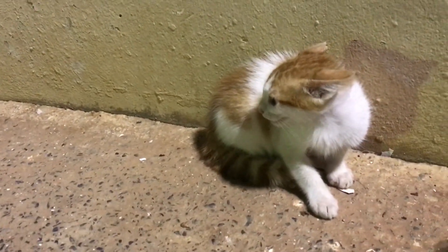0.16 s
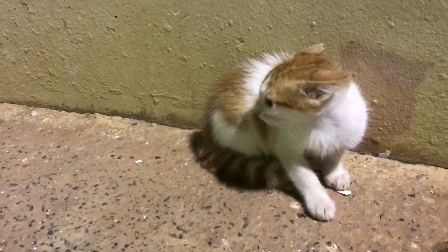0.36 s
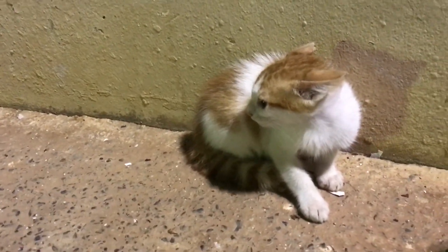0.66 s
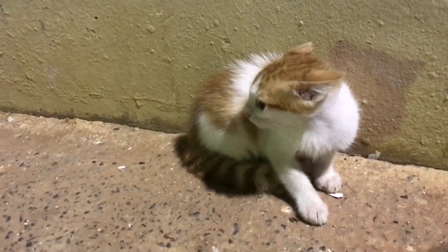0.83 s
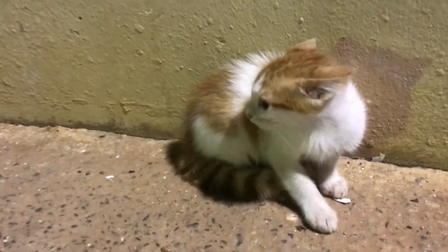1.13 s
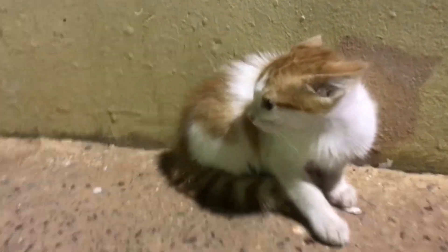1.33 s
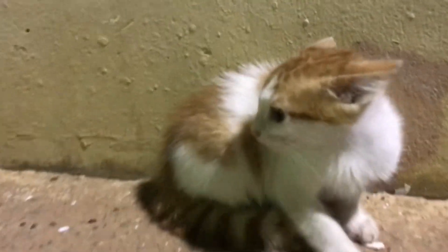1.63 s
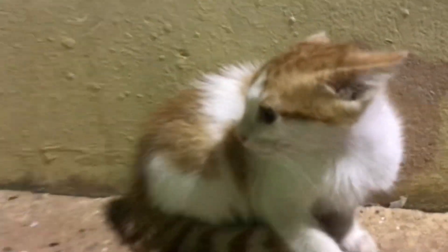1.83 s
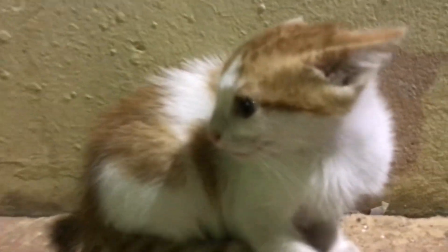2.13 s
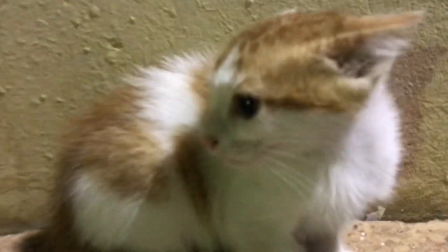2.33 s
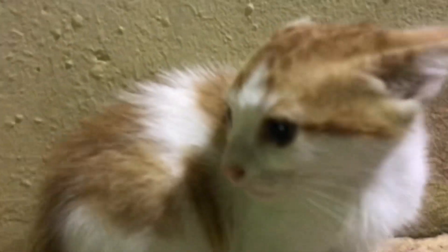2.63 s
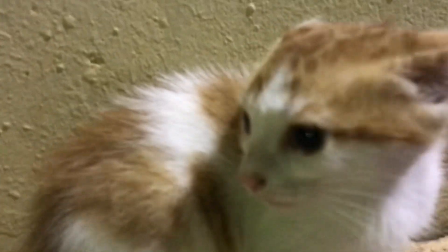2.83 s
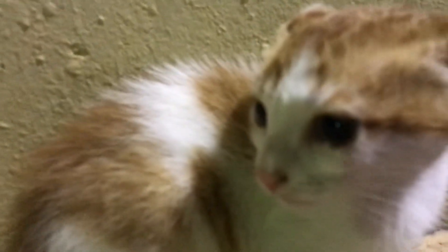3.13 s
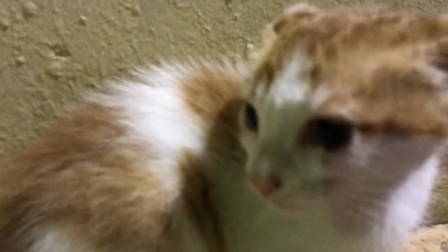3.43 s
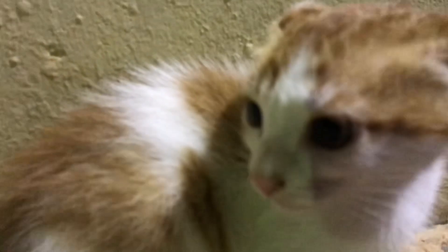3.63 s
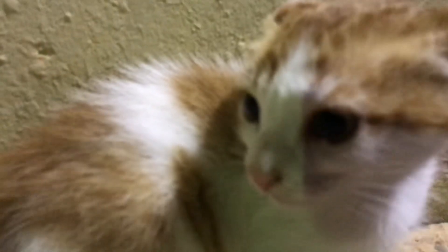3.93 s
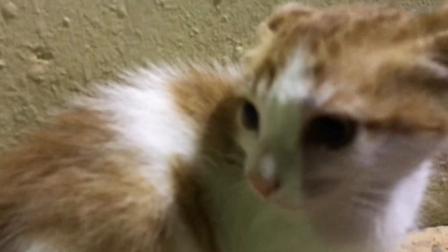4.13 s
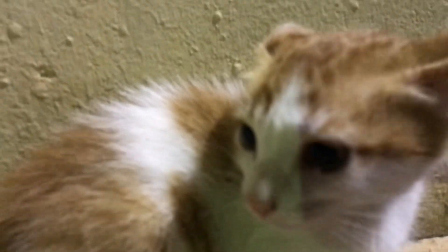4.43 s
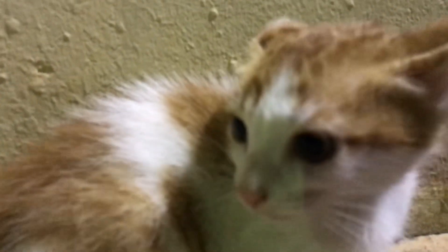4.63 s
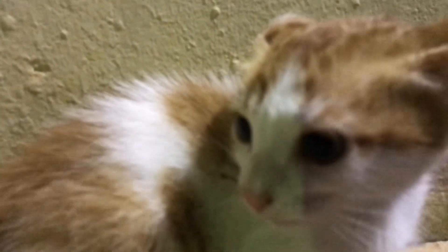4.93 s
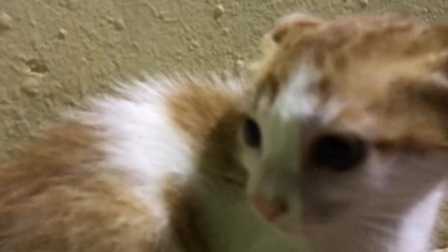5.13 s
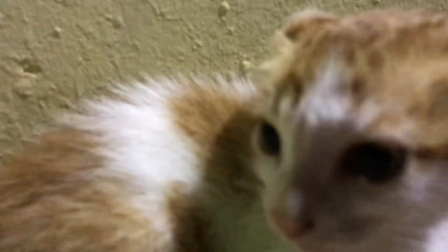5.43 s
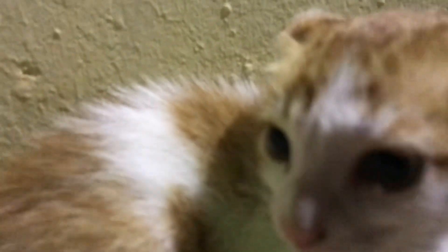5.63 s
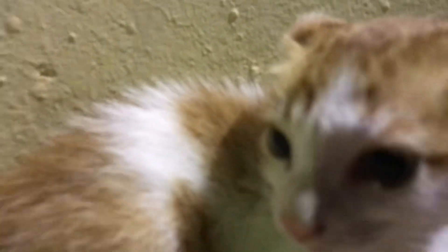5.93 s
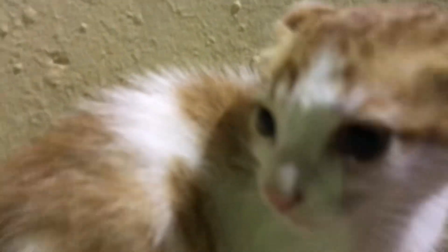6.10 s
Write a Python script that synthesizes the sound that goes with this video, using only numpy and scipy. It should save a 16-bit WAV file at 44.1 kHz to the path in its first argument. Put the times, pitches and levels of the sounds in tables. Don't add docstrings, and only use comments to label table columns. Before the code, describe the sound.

Three drawn-out throaty growls from a small kitten, humming and rattling, with low wind buffeting and a faint motor drone outdoors.

```python
import sys
import numpy as np
from scipy import signal
from scipy.fft import rfft, irfft
from scipy.io import wavfile
from scipy.ndimage import uniform_filter1d

SR = 44100
rng = np.random.default_rng(int(sys.argv[2]) if len(sys.argv) > 2 else 0)


def generate_wav(sig):
    pcm = np.round(np.clip(np.atleast_2d(sig).T, -1, 1) * 32767).astype(np.int16)
    wavfile.write(sys.argv[1], SR, pcm)


def nominal_scale(level):
    x = np.asarray(level, float) / 20
    return 10 ** x


N = 276066


def rms_one(x):
    return x / np.sqrt(np.mean(x ** 2) + 1e-20)


def in_time(rows):
    s, *columns = np.transpose(rows)
    return [np.interp(np.arange(N) / SR, s, c) for c in columns]


def joined(calls, edge_s=0.0027):
    t = np.arange(N) / SR
    gate = np.zeros(N)
    for call in calls:
        start, end = call[0][0], call[-1][0]
        since_start = t - start + (start == 0)
        until_end = end + .001 - t + (end > 6.2)
        gate += np.clip(np.minimum(since_start, until_end) / edge_s, 0, 1)
    return in_time([row for call in calls for row in call]), gate


def bumps(rows):
    t = np.arange(N) / SR
    return sum(size_db * np.exp(-((t - s) / half) ** 4) for s, half, size_db in rows)


def drift(rate_hz):
    r = np.exp(-2 * np.pi * rate_hz / SR)
    wander = signal.lfilter([1], [1, -2 * r, r * r], rng.standard_normal(N + SR))
    return rms_one(wander[SR:])


def band(x, low_hz, high_hz, order=2):
    return signal.sosfilt(signal.butter(order, [low_hz, high_hz], "band", fs=SR, output="sos"), x)


def evened(x, seconds):
    power = uniform_filter1d(x ** 2, size=int(seconds * SR)) + 1e-12
    return rms_one(x / power ** 0.34)


def resonate(x, hz, width):
    r = np.exp(-np.pi * width / SR)
    poles = [1, -2 * r * np.cos(2 * np.pi * hz / SR), r * r]
    return signal.lfilter([(1 - r * r) / 2, 0, (r * r - 1) / 2], poles, x)


def cavity(x, modes):
    out = np.zeros(N)
    for k, (hz, width, db) in enumerate(modes):
        ring = resonate(resonate(x, hz, width), hz, width * 1.37)
        out += nominal_scale(db) * (-1) ** k * ring
    return out / np.sqrt(uniform_filter1d(out ** 2, size=6000) + 1e-12)


def tone(hz, level_db):
    return np.sqrt(2) * nominal_scale(level_db) * np.sin(2 * np.pi * np.cumsum(hz) / SR)


def clicks_at(turns, spread_db):
    return np.diff(np.floor(turns), prepend=0) * nominal_scale(spread_db * rng.standard_normal(N))


def air():
    # f/Hz, level per Hz/dB
    hiss_colour = [(150, -39), (260, -1), (348, -2.5), (427, -8), (490, -5.5), (971, -11), (1400, -17),
                   (15500, -29)]
    # t/s, level/dB
    street = [(.5, -75), (1.1, -73), (1.9, -76), (2.2, -76.5), (4.0, -65.5), (4.3, -65.5), (4.6, -65.5),
              (5.0, -67)]
    hz, level_db = np.transpose(hiss_colour)
    f = np.arange(N // 2 + 1) * SR / N + 1
    colour = nominal_scale(np.interp(np.log(f), np.log(hz), level_db))
    hiss = irfft(rfft(rng.standard_normal(N)) * colour, N)
    hiss = nominal_scale(-76.0) * hiss / np.sqrt(np.mean(band(hiss, 1204, 4300) ** 2))
    tyres = rng.standard_normal(N)
    murmur = rms_one(band(tyres, 184, 249)) + nominal_scale(-7.5) * rms_one(band(tyres, 450, 1440))
    street_db, = in_time(street)
    return hiss + nominal_scale(street_db + 2.1 * drift(6.7)) * murmur


def wind():
    # t/s, level/dB
    strength = [(0, -54), (.5, -59.5), (.8, -58), (1.1, -62), (1.25, -51.5), (1.75, -56), (1.9, -59.5),
                (2.25, -50), (2.55, -52.5), (2.9, -57), (3.4, -51), (3.7, -54), (4.1, -51.5), (4.5, -53),
                (4.85, -46), (5.1, -52.5), (5.6, -54), (6.26, -59)]

    def gusting(level_db):
        return nominal_scale(level_db + 2 * drift(3.3))

    white = rng.standard_normal((3, N))
    thump = gusting(-6.5) * evened(band(white[0], 37.8, 63.0, order=3), 0.068)
    buffet = gusting(-2.5) * evened(band(white[1], 57.7, 94), 0.092)
    flutter = gusting(-11.5) * evened(band(white[2], 110.7, 162.0, order=3), 0.018)
    wind_db, = in_time(strength)
    return nominal_scale(wind_db) * (thump + buffet + flutter)


def motors():
    # t/s, f/Hz, level/dB
    idle = [(4.75, 51.04, -70), (5.0, 50.55, -57), (5.44, 50.64, -51.5), (5.82, 51.7, -52),
            (6.26, 51.6, -54)]
    # t/s, f/Hz, level/dB
    passing = [(3.35, 127, -57), (3.6, 126.8, -62), (3.95, 130.5, -65), (4.2, 135, -56.5),
               (4.35, 140.8, -59.5), (4.65, 143, -57), (4.85, 146, -62)]
    # t/s, f/Hz, level/dB
    whine = [(3.2, 1662, -110), (3.35, 1662, -85), (3.65, 1661, -87), (3.9, 1662, -110)]
    out = tone(*in_time(whine))
    for rows in (idle, passing):
        (hz, level_db), gate = joined([rows], edge_s=0.17)
        out = out + gate * tone(hz * (1 + .01 * drift(6)), level_db + 1 + 2.2 * drift(8))
    return out


def swish():
    # t/s, level/dB
    swell = [(0, -74), (.08, -71), (.27, -70), (.33, -88), (6.26, -100)]
    white = rng.standard_normal(N)
    ring = rms_one(resonate(resonate(white, 1050, 160), 1050, 200))
    sheen = rms_one(resonate(white, 5600, 700))
    swell_db, = in_time(swell)
    return nominal_scale(swell_db) * (ring + nominal_scale(-14) * sheen)


def fold_hum(pitch, hum_db, cycles, slack, loose):
    swayed = pitch * (1 + 0.12 * loose / cycles * np.cos(slack - 1.5))
    stumble = np.clip(loose - np.roll(loose, int(.012 * SR)), 0, 1)
    hum = tone(swayed, hum_db - 10 * stumble + 1.6 * loose * drift(35))
    octave_db = -65 + 0.21 * (hum_db + 43.5) + 3 * drift(10)
    return hum + tone(2 * swayed, octave_db)


def throat_rattle(pitch, rattle_db, uneven, slack):
    # f/Hz, width/Hz, level/dB
    chest = [(136, 26, 0)]
    low_throat = [(272.8, 74.6, 0)]
    high_throat = [(308, 119.6, -3), (391.7, 124, -3.5)]
    nose = [(544, 150, 6), (679, 215, -1.5)]
    mouth = [(886, 143, 6.5), (1020, 130, -5)]
    # t/s, half length/s, change of leak/dB
    lips = [(.15, 0.12, -9), (2.75, 0.21, 7), (3.65, 0.14, -0.5), (5.65, .3, 2.5)]
    turns = np.cumsum(pitch) / SR
    shifted = np.maximum.accumulate(turns + .27 * np.sin(slack) + .9 * uneven * drift(120))
    pulses = -clicks_at(shifted, spread_db=1.5) * nominal_scale(3 * np.cos(slack - .8))
    breathy = pulses + 0.024 * rng.standard_normal(N)
    rings = [(pulses, chest, -10), (pulses, low_throat, 2.5), (pulses, high_throat, -1.5),
             (breathy, nose, -8), (breathy, mouth, -17 + bumps(lips))]
    rattle = np.zeros(N)
    for drive, modes, db in rings:
        waver_db = 1.2 * drift(7.8)
        rattle += nominal_scale(rattle_db + db + waver_db) * cavity(drive, modes)
    return rattle


def snap():
    # t/s, level/dB
    catch = (2.341, -39.5)
    start, level_db = catch
    after = np.maximum(np.arange(N) / SR - start, 0) / .0006
    return nominal_scale(level_db) * after * np.exp(1 - after)


def kitten():
    # t/s, pitch/Hz, hum level/dB, rattle level/dB
    growls = [
        [(0.0, 187, -50.5, -58), (.2, 194.7, -47, -59), (.27, 206.9, -47, -59.5), (.47, 218.1, -49.5, -56.5),
         (.5, 235, -46.5, -62.5), (.72, 257.6, -46.5, -54), (.87, 255.4, -49, -56),
         (1.015, 238.4, -56.5, -59.5), (1.04, 238, -69, -75)],
        [(2.335, 186.8, -50, -64), (2.47, 191.6, -47, -56), (3.04, 194.6, -43, -51), (3.17, 208.2, -42, -50),
         (3.2, 232.1, -41, -50.5), (3.48, 240.8, -40.5, -52.5), (3.51, 223.2, -44.5, -46.5),
         (3.895, 214.5, -50.5, -50), (3.935, 200.5, -59, -70.5)],
        [(5.075, 200.2, -53, -64.5), (5.12, 190.5, -46.5, -55.5), (5.3, 181.9, -47.5, -52.5),
         (5.6, 184.1, -45, -51.5), (5.68, 204.4, -44, -50.5), (5.92, 208.2, -46.5, -52),
         (6.13, 205.1, -49.5, -50.5), (6.18, 225.4, -45, -51.5), (6.26, 204.8, -56, -54)],
    ]
    # t/s, fold cycles per slack cycle, irregularity [0-1]
    regime = [(0, 3, .05), (.55, 3, .06), (.62, 2, .11), (1.1, 2, .11), (2.3, 3, .12), (2.8, 3, .08),
              (2.84, 3, .02), (3.05, 3, .03), (3.25, 3, .11), (3.5, 3, .12), (3.95, 3, .12), (5.05, 3, .12),
              (5.3, 2.4, .09), (5.55, 2.4, .09), (5.62, 3, .13), (6.26, 3, .12)]
    # t/s, half length/s, depth/dB
    lapses = [(.55, .007, -12), (.623, .021, -18), (.682, .022, -13), (.74, .021, -16), (.812, .012, -10),
              (.858, .02, -16), (.965, .021, -16), (2.385, .012, -7), (2.44, .01, -7), (2.545, .012, -8),
              (2.71, .014, -7), (2.77, .01, -6), (3.212, .026, -11), (3.283, .012, -8), (3.325, .008, -7),
              (3.4, .014, -10), (3.467, .023, -13), (5.153, .009, -7), (5.197, .01, -10), (5.24, .011, -7),
              (5.44, .009, -8), (5.59, .011, -9), (6.18, .014, -10)]
    (pitch, hum_db, rattle_db), gate = joined(growls)
    cycles, uneven = in_time(regime)
    loose = nominal_scale(bumps(lapses))
    shake = .028 * drift(40) + .22 * uneven * drift(14)
    pitch = pitch * (1 + .04 * (1 - loose) + loose * shake)
    slack_hz = pitch / cycles * np.exp(2.2 * uneven * drift(45))
    slack = 2 * np.pi * np.cumsum(slack_hz) / SR

    hum = fold_hum(pitch, hum_db, cycles, slack, loose)
    rattle = throat_rattle(pitch, rattle_db, uneven, slack)
    voice = hum + loose * nominal_scale(1.5 * drift(14)) * rattle

    def power(size):
        return uniform_filter1d(uniform_filter1d(voice ** 2, size=size), size=size) + 1e-12

    held = (power(1500) / power(200)) ** .3
    return gate * voice * held + snap()


def scene():
    return (air() + wind() + motors() + swish() + kitten())[None]


def roll_off(x):
    return signal.sosfilt(signal.butter(12, 15660, fs=SR, output="sos"), x)


def record(dry):
    # f/Hz, width/Hz, depth [0-1]
    mic_dips = [(4950, 170, 0.9), (7660, 810, 0.35), (10340, 710, 0.46)]
    for hz, width, depth in mic_dips:
        dry = dry - np.clip(depth, 0, .9) * resonate(dry, hz, width)
    fade = np.clip(np.arange(N)[::-1] / (0.0024 * SR), 0, 1)
    return roll_off(dry * fade)


dry = scene()
out = record(dry)
generate_wav(out)
```